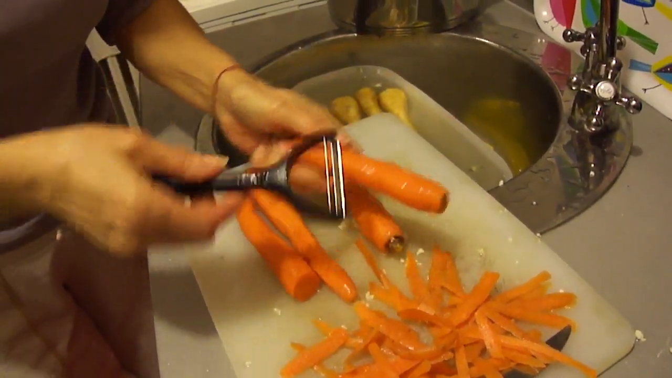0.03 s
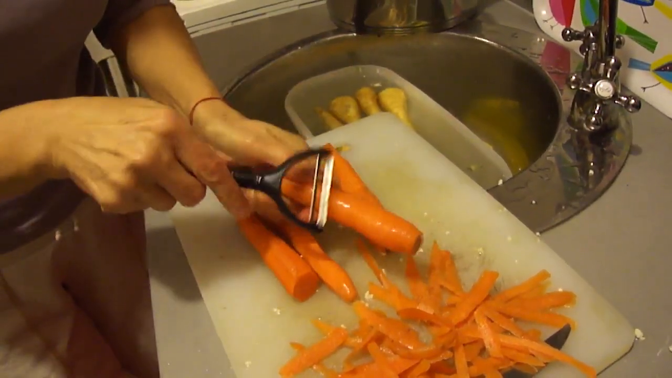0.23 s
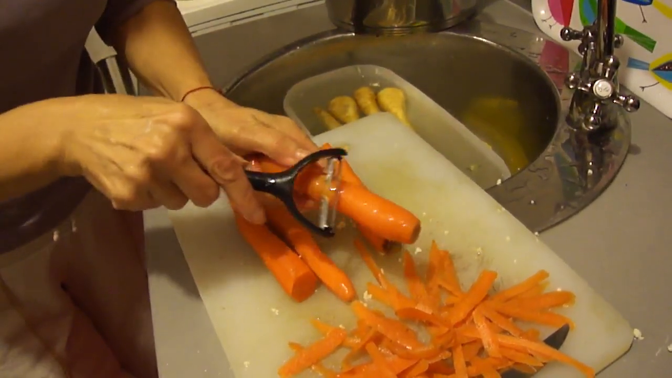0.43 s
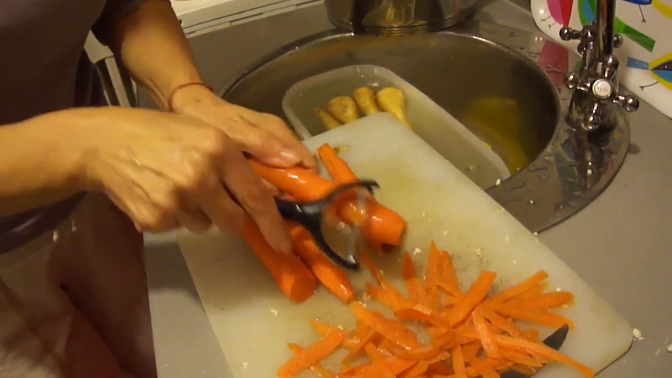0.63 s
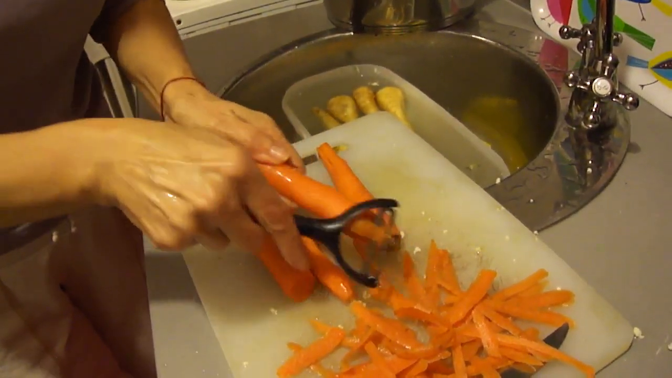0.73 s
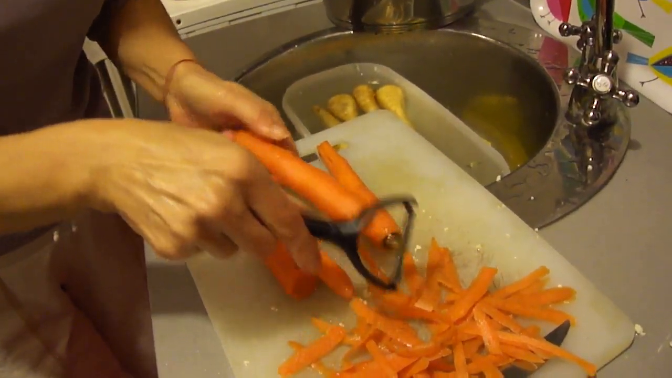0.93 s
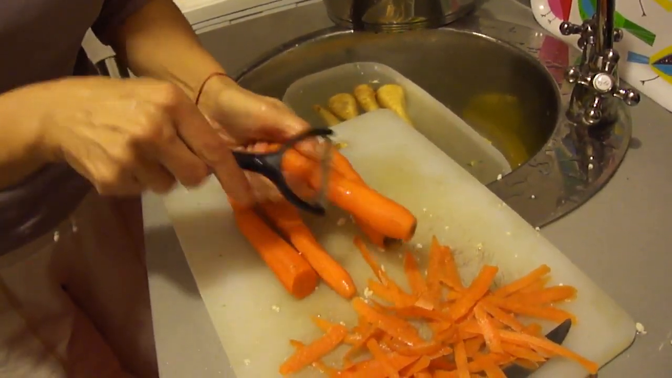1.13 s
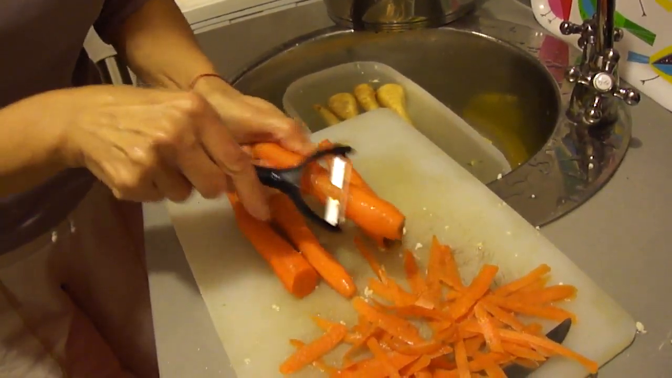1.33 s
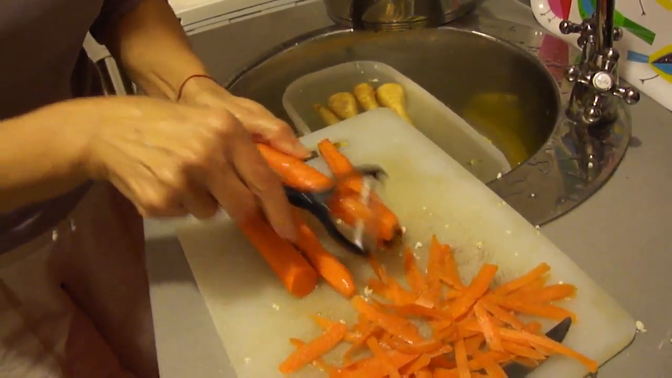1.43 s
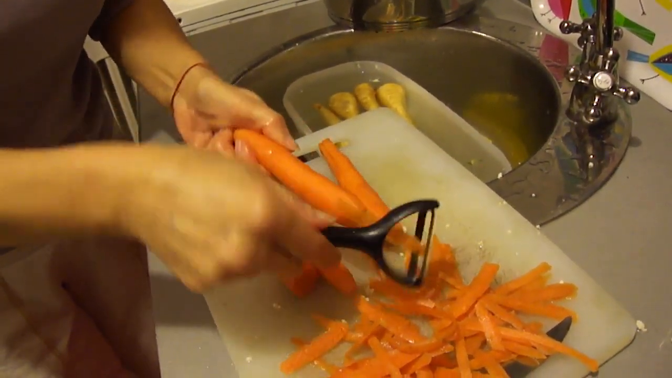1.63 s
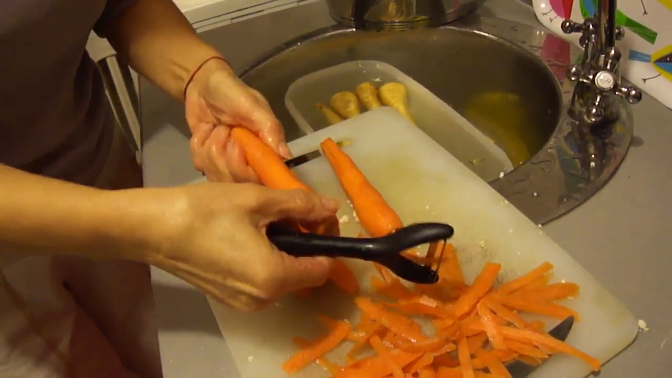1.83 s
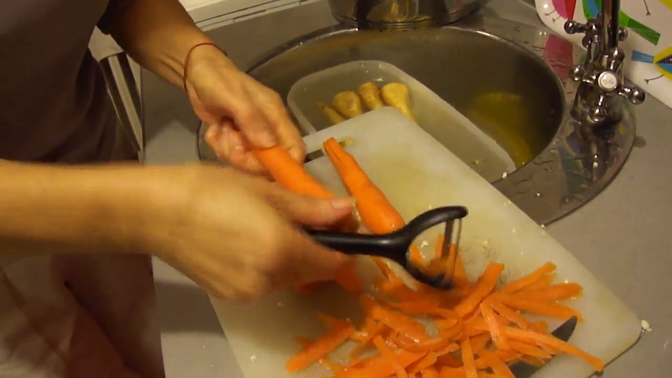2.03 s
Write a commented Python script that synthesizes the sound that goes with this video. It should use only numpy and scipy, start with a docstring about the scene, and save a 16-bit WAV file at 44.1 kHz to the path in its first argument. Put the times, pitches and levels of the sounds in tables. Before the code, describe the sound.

A vegetable peeler strips a raw carrot, heard close in a small, hard kitchen with soft steady hum. The loose blade rattles faintly from 0.1 to 0.3 seconds, lands with a sharp clack at 0.44, rasps in crisp jerks and snaps free at 0.86. Light clicks and a soft peel pat follow near 1.1. It clacks down again at 1.36, rasps smoothly until 1.65, then clacks at 1.7 and 1.8, fading into small ticks.

```python
"""A swivel peeler is drawn along a carrot over a board in a small hard kitchen, heard by one microphone.
The room hums softly throughout. The loose blade first clacks in its frame, lands, rasps through the skin
in jerks and snaps free; a strip of peel drops, the blade lands and rasps again, and clacks close the scene.
Clacks are noise bursts that excite damped modes; the rasp is dense random grains sent through resonances."""
import sys
import numpy as np
from scipy import signal
from scipy.fft import rfft, irfft
from scipy.io import wavfile

SR = 44100
rng = np.random.default_rng(int(sys.argv[2]) if len(sys.argv) > 2 else 0)


def to_linear_factor(level_db):
    """Convert decibel levels (scalar or array-like) to linear amplitude factors."""
    exponent = np.asarray(level_db, float) / 20
    return 10 ** exponent


def store_wav(level_fs):
    """Save 16-bit WAV to argv[1]."""
    pcm = np.round(np.clip(np.atleast_2d(level_fs), -1, 1) * 32767)
    wavfile.write(sys.argv[1], SR, pcm.T.astype(np.int16))


N = 90405   # length in samples


def rms_one(x):
    """Normalisation: the root mean square becomes 1."""
    return x / np.sqrt(np.mean(x ** 2) + 1e-20)


def at_hz(points, hz):
    """Interpolation along a logarithmic frequency axis."""
    point_hz, value = np.transpose(points)
    return np.interp(np.log(hz), np.log(point_hz), value)


def colour(x, spectrum):
    """Spectral shaping: a zero-phase filter imposes a spectrum; rms 1."""
    hz = np.arange(N // 2 + 1) * SR / N + 1   # 1 Hz up, so that the logarithm exists
    return rms_one(irfft(rfft(x) * to_linear_factor(at_hz(spectrum, hz)), N))


def resonate(x, peaks):
    """Resonance: parallel two-pole filters of alternating sign, each (Hz, width Hz, dB); rms 1."""
    out = 0
    for k, (hz, width_hz, db) in enumerate(peaks):
        r = np.exp(-np.pi * width_hz / SR)
        poles = [1, -2 * r * np.cos(2 * np.pi * hz / SR), r * r]
        out = out + (-1) ** k * to_linear_factor(db) * signal.lfilter([1 - r, 0, r - 1], poles, x)
    return rms_one(out)


def ring(clicks, hz, t60):
    """Impulse response of a damped mode: a unit click sets a sine of height 1 ringing."""
    r, w = to_linear_factor(-60 / (t60 * SR)), 2 * np.pi * hz / SR
    return signal.lfilter([0, np.sin(w)], [1, -2 * r * np.cos(w), r * r], clicks + 1e-18)


def high_pass(x, order, hz):
    """Butterworth filter: frequencies below the corner are attenuated."""
    return signal.sosfilt(signal.butter(order, hz, "high", fs=SR, output="sos"), x)


def drift(corner_hz):
    """Random modulation: white noise through two equal low-pass poles, spread 1."""
    r = np.exp(-2 * np.pi * corner_hz / SR)
    return rms_one(signal.lfilter([1], [1, -2 * r, r * r], rng.standard_normal(N)))


def grips(rows):
    """Contact envelope: linear rise, hold with a slope in dB, exponential release."""
    attack_s, release_s = 0.006, 0.0091
    t, out = np.arange(N) / SR, 0
    for start, end, db, change_db in rows:
        rise = np.clip((t - start) / attack_s, 0, 1)
        release = np.exp(-np.clip(t - end, 0, None) / release_s)
        slope_db = change_db * np.clip((t - start) / (end - start), 0, 1)
        out = out + rise * release * to_linear_factor(db + slope_db)
    return out


def room_tone():
    """Stationary noise: a broad soft spectrum with a faint narrow-band whine above it."""
    # air noise spectrum: frequency_hz, relative_level_db (per Hz)
    air_spectrum = [(15, -92), (25, -65), (81, -10), (169, -8.5), (207, -5.5), (281, -3.5), (531, -6.5),
                    (668, -7), (1110, -8), (1400, -10), (2450, -16), (11000, -29.5), (14300, -69),
                    (22000, -120)]
    white = rng.standard_normal((2, N))
    air = to_linear_factor(-48.5) * colour(white[0], air_spectrum)
    whine = to_linear_factor(-65) * resonate(white[1], [(7900, 100, 0)])
    return air + whine


def kitchen(x):
    """Reverberation: convolution with noise that decays exponentially, band by band."""
    # reverberation time, for a fall of 60 dB: frequency_hz, t60_s
    room_t60 = [(500, 0.13), (2500, 0.17), (6000, 0.2), (11000, 0.096)]
    gap_s = 0.0076   # silence before the first reflections
    t = np.arange(SR // 2) / SR
    edges = 350 * 2 ** np.arange(0, 5.6, .5)   # half-octave bands, Hz
    white = rng.standard_normal((2, len(t)))
    tail = 0
    for k, (low, high) in enumerate(zip(edges, edges[1:])):
        band = signal.butter(2, [low, high], "band", fs=SR, output="sos")
        decay = to_linear_factor(-60 * t / at_hz(room_t60, np.sqrt(low * high)))
        tail = tail + signal.sosfilt(band, white[k % 2]) * decay
    tail = tail * (t > gap_s)
    return signal.fftconvolve(x, tail / np.sqrt(np.sum(tail ** 2)))[:N]


def thumps():
    """Impulsive excitation: hard contacts push a dull thump, a low-passed pulse, through the board."""
    # board thumps: start_s, peak_db
    contacts = [(0.437, -27.5), (0.516, -41), (0.8601, -23), (1.359, -27), (1.68, -32), (1.738, -52)]
    corner_hz = 500
    s, db = np.transpose(contacts)
    pulses = np.zeros(N)
    pulses[(s * SR).astype(int)] = to_linear_factor(db)
    return signal.lfilter([1], [1, -np.exp(-2 * np.pi * corner_hz / SR)], pulses)


def peel_drop():
    """Damped oscillation: a strip of peel lands with a soft dull pat, one decaying sine."""
    # landing peel: start_s, level_db, pitch_hz, t60_s
    landings = [(1.127, -33, 787, 0.044)]
    out = 0
    for s, db, hz, t60 in landings:
        out = out + ring(to_linear_factor(db) * (np.arange(N) == int(s * SR)), hz, t60)
    return out


def clacks():
    """Modal excitation: a tick and a short noisy crack ring most the modes near the strongest region."""
    # blade clacks: start_s, crack_level_db, centre_hz (strongest region), crack_s (decay), ringing_db
    hits = [(0.088, -30.5, 3050, 0.0028, 4), (0.094, -26, 3550, 0.0012, 3.5), (0.099, -33, 3300, .004, 1),
            (0.2148, -21, 4150, 0.0017, 0), (0.217, -35.5, 5450, 0.0036, 8), (0.219, -20, 3050, 0.0024, 1),
            (0.2395, -25, 4420, 0.0033, 2), (0.25, -41, 3700, 0.0033, -6), (0.2804, -25, 5470, .004, -0.5),
            (0.283, -28, 4100, 0.0037, 3), (0.316, -25, 4230, .003, -2), (0.434, -20, 4000, 0.0045, -9.5),
            (0.437, -6.5, 4250, 0.0022, -6.5), (0.4405, -25, 4050, .003, -8),
            (0.446, -12.5, 4350, 0.0017, -15), (0.518, -43, 1300, .001, -15),
            (0.8592, -1, 9500, 0.00022, -16), (0.93, -21, 4760, 0.002, -1), (0.9966, -17, 3420, 0.0015, -6),
            (1.0, -32, 1200, 0.011, 3.5), (1.013, -19.5, 4060, 0.0015, -5),
            (1.3604, -4.5, 4370, 0.0026, -7.5), (1.365, -17, 2670, 0.0023, 4), (1.373, -38, 3880, .003, 0),
            (1.679, -4.5, 4800, 0.00076, -14), (1.682, -14, 2650, 0.0024, -3.5),
            (1.77, -53, 4150, .003, -4), (1.79, -8, 4900, 0.0036, -19.5), (1.791, -31.5, 1200, .002, 6),
            (1.798, -28, 2670, 0.0034, 5), (1.895, -23.5, 4630, 0.0021, -19),
            (1.958, -37.5, 3030, 0.0035, 2.5), (1.985, -33, 7900, 0.0018, 6)]
    # peeler modes: pitch_hz, relative_level_db, t60_s
    modes = [(1200, -1, 0.024), (1860, -33, 0.017), (2360, -2, 0.02), (2670, -5, 0.037),
             (3040, -5.5, 0.043), (3860, -7.5, 0.014), (4100, 1.5, 0.022), (4420, 4.5, 0.014),
             (5446, 1, 0.032), (5640, -9.5, 0.019), (8600, -11, 0.034)]
    focus_db_per_octave, modes_db = 31, -0.5
    relative_width, unfiltered_db = 1.33, -9.5   # region width over centre; share of the raw crack
    span = SR // 25
    t, out = np.arange(span) / SR, np.zeros(N + SR)
    noise = rng.standard_normal((len(hits), span))
    mode_luck_db = rng.standard_normal((len(hits), len(modes)))
    trains = np.zeros((len(modes), N + SR))
    hz, mode_db, t60 = np.transpose(modes)
    for (s, db, centre_hz, crack_s, ring_db), burst, luck_db in zip(hits, noise, mode_luck_db):
        i = int(s * SR)
        tick = 1.48 * (t == 0)
        crack = .45 * burst * np.exp(-t / max(crack_s, 1e-4)) + tick
        region = [(centre_hz, relative_width * centre_hz, 0)]
        body = resonate(resonate(crack, region), region) + to_linear_factor(unfiltered_db) * rms_one(crack)
        out[i:i + span] += to_linear_factor(db) * body / np.abs(body).max()
        distance_db = focus_db_per_octave * np.abs(np.log2(hz / centre_hz))
        gains = to_linear_factor(db + ring_db + modes_db + mode_db - distance_db + luck_db)
        trains[:, i:i + span] += gains[:, None] * crack / np.sqrt(np.sum(crack ** 2))
    cracks = high_pass(out[:N], 3, 1760)
    rings = sum(ring(train[:N], f, d) for train, f, d in zip(trains, hz, t60))
    return cracks + high_pass(rings, 2, 950)


def tear_grains():
    """Shot noise: fibres tear in dense random grains, whose level judders by chance."""
    grains_per_s = 3500
    size_db = 3.5 * np.minimum(rng.exponential(1, N), 5)
    sizes = to_linear_factor(size_db) * rng.choice([-1, 1], N)
    judder = drift(96)
    grains = sizes * (rng.random(N) < grains_per_s / SR) * to_linear_factor(2.5 * judder)
    return grains, judder


def skids(grains):
    """Broad resonance: the edge skids without cutting, and grains excite one wide band twice filtered."""
    # skids: start_s, end_s, level_db, change_db (reached at the end)
    contacts = [(0.45, 0.5, -42, -2.5), (0.876, 0.945, -30.5, -8.5), (1.375, 1.41, -35, -5.5),
                (1.645, 1.675, -46, -10)]
    band = [(3260, 1600, 0)]
    shifted = np.roll(grains, N // 3)   # decorrelates it from the bite
    return grips(contacts) * resonate(resonate(shifted, band), band)


def slides(grains, judder, bite):
    """Friction noise: sliding along the carrot, and biting, hisses; sliding also hums in the frame."""
    # strokes, each a list of: time_s, hiss_db, hum_db
    strokes = [
        [(0.0, -45, -49), (0.04, -59.5, -59), (0.08, -55, -66)],
        [(0.44, -18, -26), (0.46, -36, -40), (0.505, -40, -49), (0.535, -44, -49), (0.59, -30.5, -40),
         (0.625, -58, -61), (0.66, -47, -50), (0.7, -32, -38), (0.76, -40.5, -49), (0.82, -29.5, -42),
         (0.865, -32, -39), (0.9, -32, -36), (0.945, -33.5, -34), (0.985, -44, -39), (1.0, -32.5, -28.5),
         (1.025, -47, -40), (1.08, -61, -62), (1.11, -70, -56)],
        [(1.365, -20, -30), (1.39, -39, -34), (1.42, -37, -40), (1.445, -40, -43.5), (1.5, -28, -44),
         (1.6, -33, -39.5), (1.672, -29.5, -30.5), (1.695, -36, -34), (1.72, -50, -47), (1.762, -55.5, -50.5),
         (1.8, -42, -39), (1.83, -55.5, -68), (1.88, -58, -56), (1.95, -62, -60), (1.99, -53.5, -49),
         (2.05, -52, -63)],
    ]
    # hiss spectrum: frequency_hz, relative_level_db (per Hz)
    hiss_spectrum = [(600, -12), (1800, -1.5), (2500, 3), (4500, 8), (6200, 1), (8500, -3.5), (10300, 1.5),
                     (11500, 1.5)]
    # plastic frame resonances: pitch_hz, width_hz, relative_level_db
    frame_modes = [(2410, 100, 3), (2665, 96, 2.5), (3050, 460, -7.5)]
    hiss_judder_db, grain_share, bite_hiss_db = 0.9, 0.3, -4
    t, slide, hum = np.arange(N) / SR, 0, 0
    white = rng.standard_normal(N) * to_linear_factor(hiss_judder_db * judder)
    hiss = colour(white + grain_share * rms_one(grains), hiss_spectrum)
    # reversed grains decorrelate the frame from the bite
    frame = resonate(resonate(grains[::-1], frame_modes), [(2650, 990, 0)])
    for rows in strokes:
        s, hiss_db, hum_db = np.transpose(rows)
        slide = slide + to_linear_factor(np.interp(t, s, hiss_db, -120, -120))
        hum = hum + to_linear_factor(np.interp(t, s, hum_db, -120, -120))
    return np.hypot(slide, to_linear_factor(bite_hiss_db) * bite) * hiss + hum * frame


def rasp():
    """Grain-driven resonance: the edge bites under the skin in jerks and rings; slides and skids join it."""
    # bites: start_s, end_s, level_db, change_db (reached at the end)
    jerks = [(0.537, 0.599, -31, 1.5), (0.66, 0.74, -24.5, 1), (0.778, 0.836, -27.5, 6.5),
             (0.845, 0.859, -31.5, 0), (1.441, 1.64, -27, 0.5)]
    # resonances of the cutting edge: pitch_hz, width_hz, relative_level_db
    edge_modes = [(3540, 245, 8), (3977, 360, -1)]
    grains, judder = tear_grains()
    bite = grips(jerks)
    edge = resonate(resonate(grains, edge_modes), [(3700, 2600, 0)])
    return bite * edge + slides(grains, judder, bite) + skids(grains)


def scene():
    """Superposition: hands at the board and the room around them, the same in both channels."""
    near = rasp() + clacks() + peel_drop()
    reverberation = to_linear_factor(-12.5) * kitchen(near)
    peeler = high_pass(near + reverberation, 2, 77)   # low limit of the microphone
    return np.tile(peeler + thumps() + room_tone(), (2, 1))


def band_limit(x):
    """A steep low-pass at the top of the band."""
    return signal.sosfilt(signal.butter(12, 12360, fs=SR, output="sos"), x)


def record(dry):
    """Band limitation: a zero-phase filter cuts the top steeply without delay."""
    # upper band limit: frequency_hz, gain_db
    top_cut = [(11000, 0), (11040, -26), (11600, -48), (12500, -68), (14000, -90)]
    hz = np.arange(N // 2 + 1) * SR / N + 1
    mix = irfft(rfft(dry) * to_linear_factor(at_hz(top_cut, hz)), N)
    return band_limit(mix)


dry = scene()
out = record(dry)
store_wav(out)
```